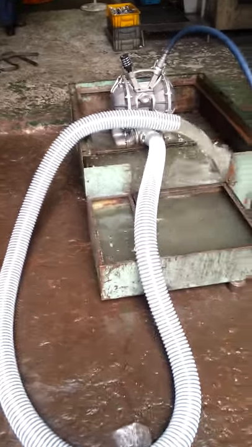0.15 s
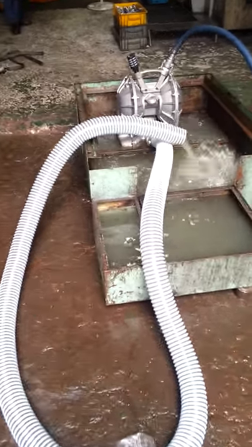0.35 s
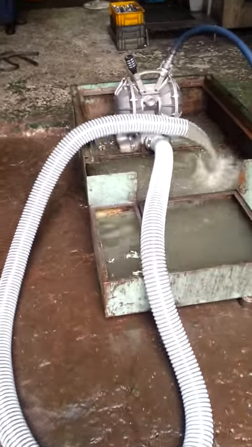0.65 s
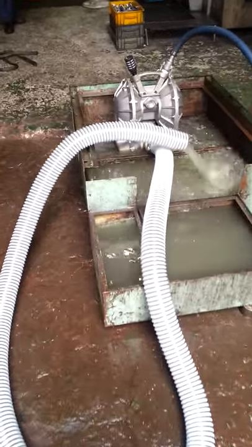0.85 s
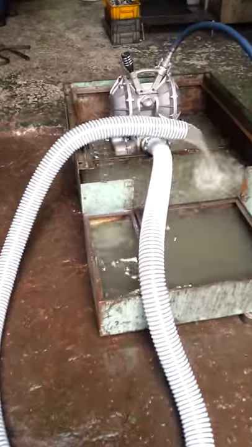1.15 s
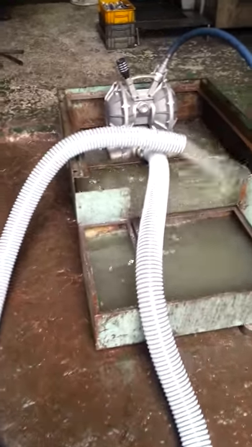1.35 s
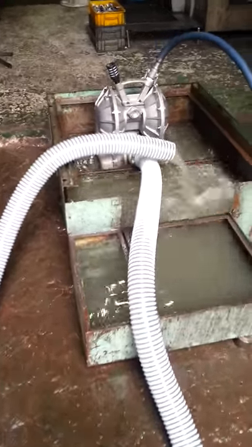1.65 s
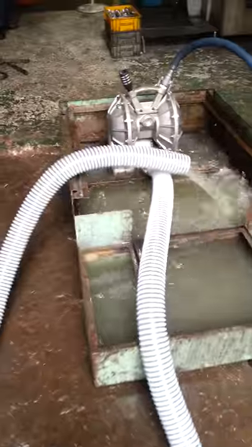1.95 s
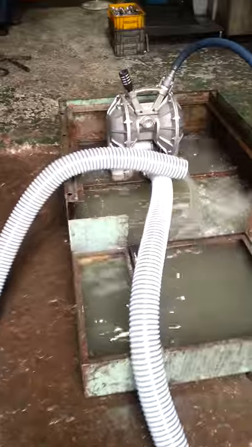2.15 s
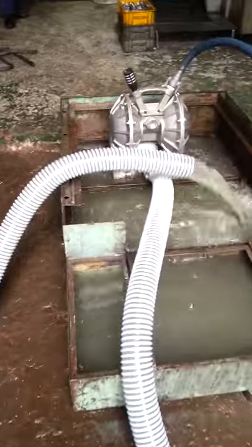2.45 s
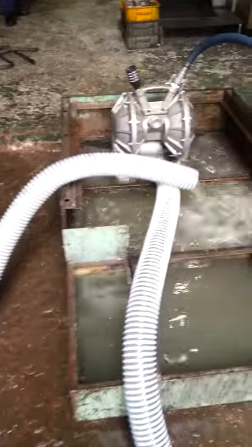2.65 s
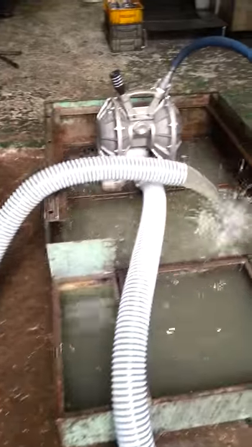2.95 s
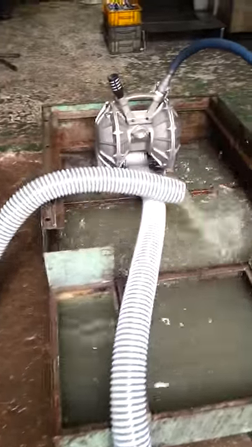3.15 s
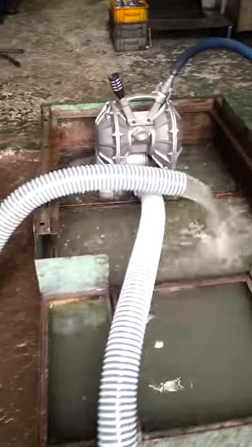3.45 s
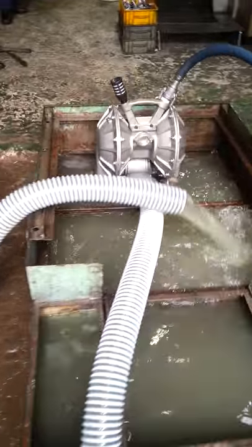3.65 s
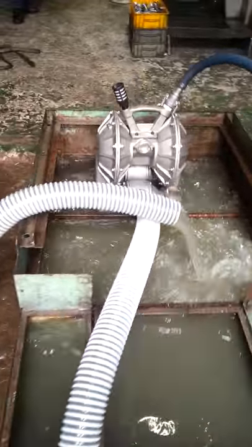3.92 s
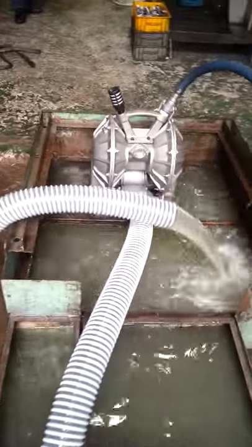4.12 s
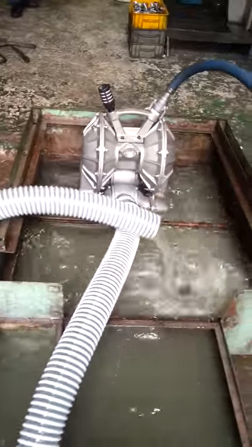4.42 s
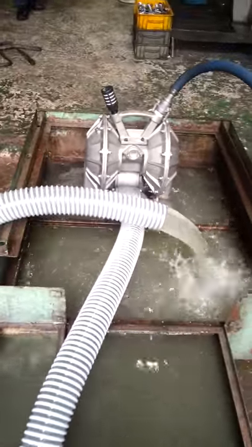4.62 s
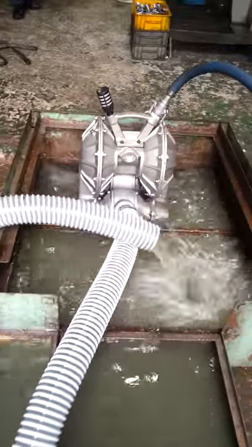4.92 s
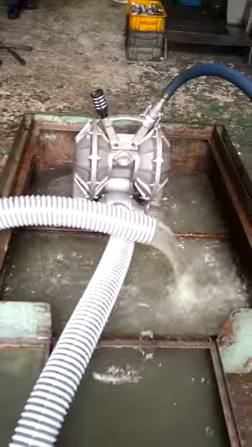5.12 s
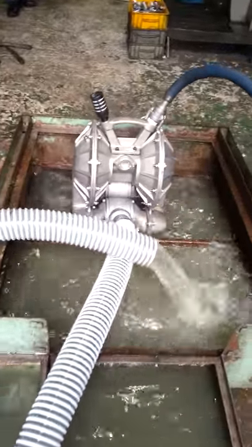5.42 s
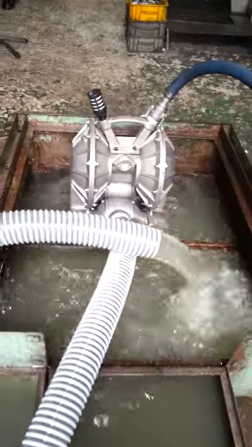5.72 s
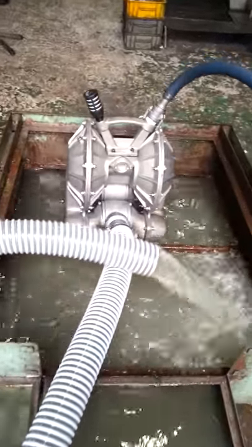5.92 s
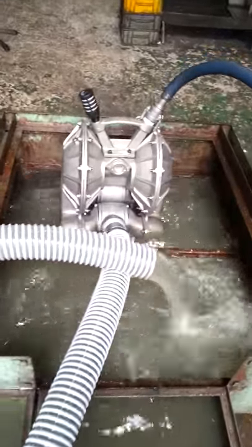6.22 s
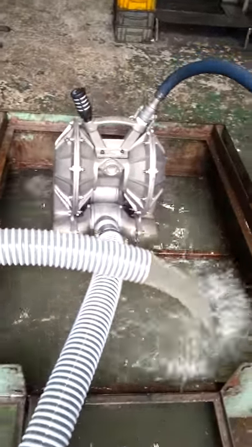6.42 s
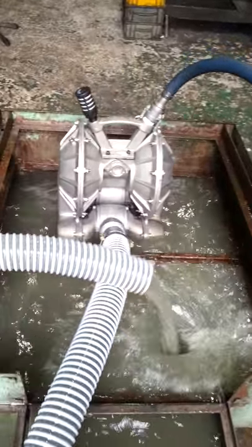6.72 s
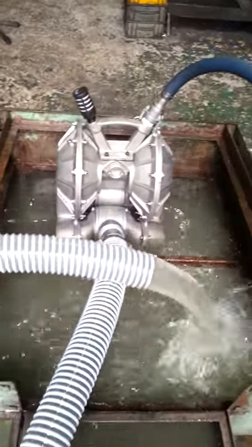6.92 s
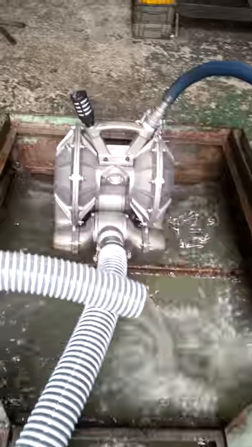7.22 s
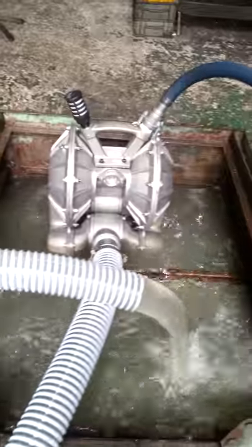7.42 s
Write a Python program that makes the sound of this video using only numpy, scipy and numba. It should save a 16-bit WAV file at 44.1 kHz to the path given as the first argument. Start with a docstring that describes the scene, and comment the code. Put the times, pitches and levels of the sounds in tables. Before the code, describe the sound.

A compressed-air pump hisses steadily with a sharp blast and knock about every half second, while water gushes, gurgles and glugs into a tank.

```python
"""A steady hiss of air, sharp blasts and knocks about every 0.57 s, and water that gushes, gurgles and glugs.
An air-driven diaphragm pump circulates water in a steel tank in a workshop; a phone hears it and moves closer.
Air noise is filtered hiss; at each reversal the valve knocks and a chamber blows down in a decaying blast.
About every third stroke sizzles and may whistle; delayed copies from nearby surfaces colour the hiss.
Water is noise plus thousands of bubbles, each a fading tone; large pockets of air plop and glug."""
import sys
import numpy as np
from scipy import signal
from scipy.fft import rfft, irfft
from scipy.io import wavfile
from scipy.ndimage import uniform_filter1d, minimum_filter1d
from numba import njit

SR = 44100
rng = np.random.default_rng(int(sys.argv[2]) if len(sys.argv) > 2 else 0)


def store_wav(level_fs):
    """Save 16-bit WAV to argv[1]."""
    pcm = np.round(np.clip(np.atleast_2d(level_fs), -1, 1) * 32767)
    wavfile.write(sys.argv[1], SR, pcm.T.astype(np.int16))


N = 333837
TIME = np.arange(N) / SR  # seconds
FREQS = np.fft.rfftfreq(N, 1 / SR)  # Hz

# How far the phone has moved towards the pump. Each row: time in seconds, distance in metres.
APPROACH = [(0, 0.067), (1.5, 0.21), (3, 0.54), (6, 1.374), (7.57, 1.46)]
# Soft low thumps as the phone overloads on some strokes. Each row: start in seconds, level in dB.
OVERLOAD_THUMPS = [(2.05, -58), (3.75, -57), (4.35, -58), (5.465, -46), (6.03, -57), (6.603, -42),
                   (7.172, -42)]
# The two microphone ports. Each row: pitch in Hz, likeness from 0 to 1, left lead in radians,
# left minus right in dB.
PORTS = [(250, 0.74, -0.1, 0.4), (400, 0.62, -0.2, 0.4), (560, 0.8, 0.2, -1.0), (730, 0.46, -0.6, 3.8),
         (880, 0.4, -1.3, -1.2), (1080, 0.47, -0.9, 0.3), (1350, 0.36, -2.6, 0.5), (1750, 0.29, -2.9, 2.0),
         (2150, 0.11, -2.0, 3.1), (2750, 0.18, -0.0, -1.4), (3600, 0.08, -2.8, -2.7),
         (5400, 0.15, 0.0, 0.5), (7000, 0.08, 1.8, -1.6), (12000, 0.06, 2.3, -3.3)]
# Overall colour of the water. Each row: pitch in Hz, relative level in dB.
SPLASH_COLOUR = [(120, -45), (215, -24), (275, -8), (420, -2.5), (580, 0.5), (800, 3.5), (1200, 2),
                 (2000, 8), (3500, 4.5), (7000, -2.5), (14000, -36)]
# Size groups of the gurgling bubbles. Each row: middle pitch in Hz, level in dB.
GURGLE_SIZES = [(620, -31.5), (950, -32), (1500, -30.5), (2400, -29.5)]
# Single bubbles that stand out. Each row: start in seconds, starting strength in dB, starting pitch in Hz.
GULPS = [(.262, -19, 548), (.968, -15, 540), (1.337, -15, 745), (1.405, -14.5, 770), (1.999, -17, 600),
         (2.258, -13, 1060), (2.322, -15.5, 667), (2.689, -14, 650), (3.102, -16, 577), (3.133, -17, 794),
         (3.27, -23, 570), (3.43, -17, 670), (3.94, -19, 562), (4.555, -21, 514), (4.823, -16, 784),
         (4.894, -12, 1035), (5.08, -13, 552), (6.347, -19, 597), (6.518, -16, 595), (6.551, -13, 860),
         (7.099, -17.5, 502), (7.123, -14.5, 580)]
# Deep glugs, a strong one as each gush lands and weaker ones between.
# Each row: start in seconds, reference level in dB, reference pitch in Hz.
GLUGS = [(0.216, -28, 245), (.415, -25, 234), (.772, -29, 220), (.945, -30, 226), (0.98, -21, 283),
         (1.135, -28, 223), (1.565, -24, 226), (1.668, -23.5, 221), (1.825, -31, 225), (1.988, -28, 221),
         (2.115, -22, 263), (2.298, -32, 200), (2.655, -25, 225), (2.695, -13, 307), (2.862, -24.5, 219),
         (2.99, -35, 223), (3.245, -15, 267), (3.295, -35, 205), (3.46, -37, 202), (3.825, -17.5, 247),
         (4.208, -28, 216), (4.385, -15, 242), (4.853, -29, 229), (4.963, -19, 232), (5.036, -26, 237),
         (5.13, -30.5, 211), (5.398, -27, 215), (5.528, -16, 245), (6.1, -18, 234), (6.18, -28, 226),
         (6.295, -34, 222), (6.535, -20, 230), (6.67, -16.5, 231), (6.87, -33, 223), (7.022, -30, 225),
         (7.248, -14, 232), (7.345, -23, 229)]
# The three pockets a glug breaks into. Each row: delay in seconds, level in dB relative to the glug,
# pitch as a ratio to the glug.
GLUG_PARTS = [(0, -8, 1.02), (.02, -9, 1.246), (.043, -12, 1.12)]
# Hollow bands in the rush, upper one first. Each row: centre in Hz, half width in Hz.
HOLLOW_BANDS = [(2010, 230), (1160, 210)]
# Their changing levels. Each row: time in seconds, upper band in dB, lower band in dB.
HOLLOW_LEVELS = [(0, -41, -49), (1.6, -28, -51), (2.1, -26.5, -35), (2.7, -23.5, -38), (3.2, -29.5, -38),
                 (5, -25.5, -33.5), (6.3, -28, -28.5), (7.57, -28, -26.5)]
# Valve reversals. Each row: start in seconds, blast in dB before a common lift, blow-down time in seconds,
# muffler song in dB, knock in dB.
STROKES = [(.332, -18, 0.12, -28, -32), (.906, -16, 0.13, -29, -20), (1.475, -16.5, 0.1, -32, -24),
           (2.047, -14.5, 0.12, -30, -18), (2.612, -16.5, 0.079, -26, -20), (3.187, -14, .085, -35, -19),
           (3.746, -17, 0.069, -26, -23), (4.325, -14.5, 0.061, -40, -12), (4.89, -17, .09, -31, -21),
           (5.46, -15, 0.1, -41, -14), (6.028, -14.5, 0.062, -33, -21), (6.602, -13, 0.094, -38, -11.5),
           (7.169, -13, 0.052, -19.5, -12.5)]
# Check balls that clack on their seats. Each row: start in seconds, level in dB.
CHECK_BALLS = [(.404, -23), (1.484, -19), (2.078, -19), (3.419, -17), (3.773, -15), (4.918, -14),
               (4.958, -12.5), (6.046, -13)]
# Ringing tones of the pump housing. Each row: pitch in Hz, level in dB relative to the knock,
# cycles until it has fallen by 60 dB.
HOUSING_TONES = [(1138, -4, 78), (2030, 2.5, 124), (2380, -25, 110)]
# Colour of the dull clack. Each row: pitch in Hz, relative level in dB.
KNOCK_COLOUR = [(40, -40), (180, -33), (320, -2), (600, -11), (1200, 0), (2500, -4), (8000, -33)]
# Times when the valve leaks. Each row: start in seconds, length in seconds, sizzle in dB.
LEAKS = [(.92, 0.48, -24.5), (2.633, 0.91, -27.5), (4.33, 0.48, -19), (5.93, 0.52, -20)]
# Colour of the sizzle. Each row: pitch in Hz, relative level in dB.
SIZZLE_COLOUR = [(3000, -53), (7000, -3), (9000, 4.5), (10500, 3), (14500, 0.5)]
# Whistles of the valve and muffler. Each row: start in seconds, length in seconds, starting pitch in Hz,
# sag in Hz per second (negative rises), width in Hz, level in dB before the flutter.
WHISTLES = [(1.1, 0.44, 11880, 0, 14, -33), (1.68, .18, 11900, 0, 26, -39), (4.332, .07, 8950, 0, 130, -26),
            (4.38, .34, 8850, -200, 50, -31), (4.457, 0.3, 10500, 500, 26, -21.5),
            (4.46, .24, 9900, 300, 45, -32), (4.885, .06, 8920, 0, 40, -29),
            (6.075, 0.36, 10440, 200, 24, -29), (5.92, .42, 9000, 0, 60, -34)]
# The muffler's lasting thin whistle. Each row: time in seconds, level in dB.
MUFFLER_WHISTLE = [(0, -34), (.7, -31), (1.0, -43), (1.7, -32), (2.15, -23), (2.5, -41), (3.05, -26),
                   (3.35, -42), (3.68, -22), (3.85, -36), (3.98, -24.5), (4.3, -23), (4.55, -32),
                   (5.7, -37), (5.95, -31), (6.7, -34), (7.15, -29), (7.57, -37)]
# Colour of the steady hiss. Each row: pitch in Hz, relative level in dB.
HISS_COLOUR = [(200, -49), (400, -18.5), (750, -6.5), (1400, 1), (2100, 0.5), (2900, -2.5), (5000, -2),
               (5800, -5), (7200, -3), (7800, -8), (10000, -10), (14500, -17.5)]
# Colour of the blast. Each row: pitch in Hz, relative level in dB.
BLAST_COLOUR = [(150, -28), (400, 0), (1200, 5.5), (2300, 10.5), (5000, 12), (8000, 5), (14500, 3)]
# Muffler resonances. Each row: centre in Hz, full width in Hz, added peak in dB relative to the plain hiss.
MUFFLER_RESONANCES = [(1920, 13, 4), (3540, 220, -1.5), (5250, 84, -17), (6960, 43, -6), (7220, 120, -17)]

STROKE_S = .57
RUMBLE_DB, RUMBLE_HZ, THUMP_HZ = -79, 130, 120
WATER_DB = -22.5
# Each gush lands a little after the reversal; its churn jumps, then dies down until the next.
LANDING_S, SURGE_DB, SURGE_FALL_DB_PER_S = 0.052, 3, 12
# The spray is strongest just after the reversal and weakest about half a stroke later.
SPRAY_PEAK_S, SPRAY_SWING_DB = 0.023, 2
MUFFLER_WHISTLE_HZ, MUFFLER_WHISTLE_WIDTH_HZ = 6884, 8
# The hiss starts near this level and gains as the phone comes closer.
AIR_DB, AIR_DB_PER_M = -14.5, 0.85
# The spool shuts the exhaust a little before it flips: a slight dip; a second dip fades after the flip.
SHUT_S, SHUT_DB = 0.022, -0.5
AFTER_DIP_S, AFTER_DIP_DB = 0.013, -0.5
# Above 1, the choked exhaust holds a blast up before it falls.
BLOWDOWN_HOLD = 1.3
# The muffler's song after a blast is a narrow band of hiss that fades over the stroke.
SING_HZ, SING_WIDTH_HZ, SING_S = 3480, 44, 0.34
CEILING, TOP_HZ = .97, 14500  # peak limit as a share of full scale, and treble limit


def undb(db):
    """Turn decibels into a gain."""
    return 10 ** (np.asarray(db) / 20)


def unit(x):
    """Scale a sound to an rms (average strength) of 1."""
    return x / np.sqrt(np.mean(x ** 2))


def curve(table, at=TIME, axis=1):
    """Join one column of a table by straight lines."""
    rows = np.array(table)
    return np.interp(at, rows[:, 0], rows[:, axis])


def over_pitch(table, axis=1):
    """Join one column of a table along a logarithmic pitch scale."""
    rows = np.array(table)
    return np.interp(np.log(FREQS + 1), np.log(rows[:, 0]), rows[:, axis])


def colour(x, gain):
    """Filter by a gain for each frequency, then scale to rms 1."""
    return unit(irfft(rfft(x) * gain, N))


def noise():
    """Turbulence as separate random noise for the two ports."""
    return rng.standard_normal((2, N))


def low_noise(corner_hz):
    """Noise that weakens smoothly above a corner frequency."""
    return colour(noise(), 1 / (1 + (FREQS / corner_hz) ** 2))


def band(hz, width_hz):
    """Noise in one resonance, strongest at its centre."""
    return colour(noise(), 1 / (1 + ((FREQS - hz) / width_hz) ** 2))


def walk(rate_hz):
    """Wander smoothly and randomly with a spread of 1."""
    return colour(rng.standard_normal(N), np.exp(-(FREQS / rate_hz) ** 2))


def burst(start, rise, fall, hold=1):
    """Open quickly, then fall exponentially, or stay up at first when hold is over 1."""
    age = np.maximum(TIME - start, 0)
    opening = 1 - np.exp(-age / rise)
    return opening * np.exp(-np.minimum(age / fall, 20) ** hold)


def swell(start, length):
    """Rise and fall as the square root of half a sine wave."""
    progress = np.clip((TIME - start) / length, 0, 1)
    return np.sqrt(np.sin(np.pi * progress).clip(0))


def tone(hz, width_hz, rough=0.51):
    """An unsteady jet tone: its strength and phase waver, which widens its line."""
    waver = low_noise(width_hz)
    drift = low_noise(width_hz)
    phase = 2 * np.pi * np.cumsum(hz * np.ones(N)) / SR
    return unit((1 + rough * waver) * np.sin(phase + 2 * drift))


@njit
def ring(starts, hz, cycles, sizes, glide):
    """Fading sines; cycles counts to -60 dB, and glide raises the pitch as a bubble nears the surface."""
    out = np.zeros(N)
    for k in range(len(starts)):
        first, length = int(starts[k] * SR), int(cycles[k] * SR / hz[k]) + 2
        step = 2 * np.pi * hz[k] / SR
        # Turning a complex number makes the sine; each turn also shrinks it a little.
        state = sizes[k] + 0j
        turn = np.exp(1j * step - np.log(1000) / length)
        bend = np.exp(1j * step * glide / length)
        for i in range(max(first, 0), min(first + length, N)):
            out[i] += state.imag
            state *= turn
            turn *= bend
    return out


def closer(db_per_m):
    """Decibels gained as the phone nears the pump."""
    return db_per_m * curve(APPROACH)


def since_reversal(lag):
    """Seconds since the latest moment that lies lag seconds after a reversal."""
    # One earlier reversal began the stroke already under way.
    reversals = np.array([STROKES[0][0] - STROKE_S] + [row[0] for row in STROKES])
    marks = reversals + lag
    return TIME - marks[np.maximum(np.searchsorted(marks, TIME) - 1, 0)]


def ports(pair):
    """Two ports a hand apart hear the bass much alike and the treble almost unrelated."""
    shared, separate = rfft(pair)
    like = np.clip(over_pitch(PORTS), 0, .98)
    lag = np.exp(-1j * over_pitch(PORTS, axis=2))
    right = like * shared * lag + np.sqrt(1 - like ** 2) * separate
    lean = undb(over_pitch(PORTS, axis=3) / 2)
    return irfft(np.array([shared * lean, right / lean]), N)


def low_cut(x, hz):
    """Remove the bass steeply below a chosen frequency."""
    return irfft(rfft(x) / np.sqrt(1 + (hz / (FREQS + 1)) ** 44), N)


def tank(x, t60, wet_db):
    """Direct sound plus dense reflections from tank and workshop, different at each port."""
    age = TIME[:SR // 2]
    tail = rng.standard_normal((2, len(age))) * undb(-60 * age / t60)
    tail *= age > .003  # reflections start after 3 ms
    tail *= undb(wet_db) / np.sqrt(np.sum(tail ** 2, axis=1, keepdims=True))
    return x + signal.fftconvolve(x[None], tail, axes=1)[:, :N]


def reflections(x, echo_db, longest_s, count=12):
    """Floor, water and tank walls echo the air noise; paths change with the phone and shift its colour."""
    travel_s = uniform_filter1d(curve(APPROACH), SR // 2) / 343  # distance over speed of sound in m/s
    out = x.copy()
    for side in range(2):
        for path, slant in rng.random((count, 2)):
            delay = 0.00099 + longest_s * path + .5 * slant * travel_s
            out[side] += undb(echo_db) * np.interp(TIME - delay, TIME, x[side], left=0)
    return out / np.sqrt(1 + count * undb(echo_db) ** 2)


def rumble(fall=0.019):
    """The workshop's faint low noise, and soft low thumps as the phone overloads on some strokes."""
    thump_level = sum(undb(db) * burst(t, 0.003, fall) for t, db in OVERLOAD_THUMPS)
    thumps = thump_level * low_noise(THUMP_HZ)
    return thumps + undb(RUMBLE_DB) * low_noise(RUMBLE_HZ)


def hollows():
    """Two hollow noise bands in the rush that come forward as the phone moves in over the tank."""
    out = 0
    for k, (hz, width_hz) in enumerate(HOLLOW_BANDS):
        out = out + band(hz, width_hz) * undb(curve(HOLLOW_LEVELS, axis=k + 1))
    return out


def cloud(low_hz, high_hz, cycles, scatter_db, count):
    """Bubbles of many sizes ring at random moments, a few much louder than the rest."""
    when, size, life, strength = rng.random((count, 4)).T
    hz = low_hz * (high_hz / low_hz) ** size
    loudness = undb(-scatter_db * np.log(np.maximum(strength, .01)))
    sizes = loudness * np.sqrt(hz / low_hz)
    return ring(when * N / SR, hz, cycles * (.5 + life), sizes, 0.26)


def gush(wash_db=-7, churn_hz=380, lumpy_db=3.0):
    """The jet drives bubbles and spray into the tank; the deep churn surges with each stroke."""
    bubbles = np.array([cloud(225.4, 11820, 34.0, 3.14, count=18000) for side in range(2)])
    water = colour(unit(bubbles) + undb(wash_db) * noise(), undb(over_pitch(SPLASH_COLOUR)))
    deep = irfft(rfft(water) / (1 + (FREQS / churn_hz) ** 8), N)
    surge_db = SURGE_DB - SURGE_FALL_DB_PER_S * since_reversal(LANDING_S)
    churn = deep * undb(surge_db + lumpy_db * walk(11))
    clumps_db = .9 * walk(25)
    swing_db = SPRAY_SWING_DB * np.cos(2 * np.pi * since_reversal(SPRAY_PEAK_S) / STROKE_S)
    spray = (water - deep) * undb(swing_db + clumps_db)
    return (churn + spray) * undb(WATER_DB)


def gurgle():
    """Middling bubbles boil up in irregular clusters, each size at its own moments."""
    out = 0
    for hz, db in GURGLE_SIZES:
        bubbles = np.array([cloud(hz / 1.3, hz * 1.3, 32, 1.6, count=900) for side in range(2)])
        clusters_db = 5 * np.tanh(walk(9))
        out = out + unit(bubbles * undb(clusters_db)) * undb(db)
    return out


def pockets(gulp_cycles=42, glug_cycles=27, glide=0.089):
    """Large air pockets pinch off under the jet and ring, mostly direct: plops, and glugs that break in three."""
    rows = [(t, db, hz, gulp_cycles) for t, db, hz in GULPS]
    for t, db, hz in GLUGS:
        for lag, part_db, ratio in GLUG_PARTS:
            rows.append((t + lag, db + part_db, hz * ratio, glug_cycles))
    when, db, hz, cycles = np.array(rows, dtype=float).T.copy()
    return tank(ring(when, hz, cycles, undb(db), glide), t60=.18, wet_db=-9)


def knocks(fall=0.014, ball_fall=0.0047):
    """Spool and check balls land in the water-filled housing: short dull clacks that ring the casting."""
    blows = [(t, db, fall) for t, *_, db in STROKES]
    blows += [(t, db, ball_fall) for t, db in CHECK_BALLS]
    strength = sum(undb(db) * burst(t, 0.001, length) for t, db, length in blows)
    clack = colour(noise(), undb(over_pitch(KNOCK_COLOUR))) * strength
    rows = [(t, db + mode_db, hz, cycles) for t, db, _ in blows for hz, mode_db, cycles in HOUSING_TONES]
    when, db, hz, cycles = np.array(rows, dtype=float).T.copy()
    return clack + ring(when, hz, cycles, undb(db), 0.)


def leak(flutter_db=0.5):
    """Air squeezes past the valve: a fine sizzle, and fluttering whistles whose pitch may slide."""
    sizzle_level = sum(undb(db) * swell(t, length) for t, length, db in LEAKS)
    out = colour(noise(), undb(over_pitch(SIZZLE_COLOUR))) * sizzle_level
    flutter = unit(undb(flutter_db * walk(21)))
    for t, length, hz, sag, width_hz, db in WHISTLES:
        pitch_hz = hz - sag * np.clip(TIME - t, 0, length)
        out = out + tone(pitch_hz, width_hz) * swell(t, length) * flutter * undb(db)
    thin_whistle = tone(MUFFLER_WHISTLE_HZ, MUFFLER_WHISTLE_WIDTH_HZ, rough=.25)
    return out + thin_whistle * undb(curve(MUFFLER_WHISTLE))


def exhaust(flutter_db=0.71, blast_db=4.0):
    """Air hisses in the muffler's resonances; each reversal's blow-down blasts and makes the muffler sing."""
    resonant_power = 1
    for hz, width_hz, db in MUFFLER_RESONANCES:
        resonant_power = resonant_power + undb(db) ** 2 / (1 + (2 * (FREQS - hz) / width_hz) ** 2)
    valve_db = 0
    for t, *_ in STROKES:
        valve_db = valve_db + SHUT_DB * np.exp(-((TIME - t) / SHUT_S) ** 2) * (TIME < t)
        valve_db = valve_db + AFTER_DIP_DB * burst(t, 0.001, AFTER_DIP_S)
    hiss_db = AIR_DB + closer(AIR_DB_PER_M) + valve_db + flutter_db * walk(27)
    hiss = colour(noise(), undb(over_pitch(HISS_COLOUR)) * np.sqrt(resonant_power)) * undb(hiss_db)
    pressure = sum(undb(db) * burst(t, 0.00056, length, BLOWDOWN_HOLD) for t, db, length, _, _ in STROKES)
    sputter_db = 1.3 * walk(110)
    blast = colour(noise(), undb(over_pitch(BLAST_COLOUR))) * pressure * undb(blast_db + sputter_db)
    sing_level = sum(undb(db) * burst(t, 0.01, SING_S) for t, _, _, db, _ in STROKES)
    return hiss + blast + sing_level * band(SING_HZ, SING_WIDTH_HZ)


def scene(rush_cut_hz=252, glug_cut_hz=196):
    """Pump and water over the workshop's rumble; big air pockets reach lower than the rush."""
    air = reflections(exhaust(), echo_db=-17, longest_s=.009)
    rush = ports(air + hollows() + leak() + knocks() + gush() + gurgle())
    return low_cut(rush, rush_cut_hz) + low_cut(pockets(), glug_cut_hz) + ports(rumble())


def record(dry):
    """The phone's very fast limiter shaves the highest peaks of each channel; the top treble is cut."""
    top_cut = signal.ellip(10, .2, 70, TOP_HZ, fs=SR, output="sos")
    peaks = np.abs(signal.sosfilt(top_cut, dry))
    room = CEILING / np.maximum(peaks, CEILING)
    gain = uniform_filter1d(minimum_filter1d(room, size=41), size=35)  # about 1 ms, in samples
    return signal.sosfilt(top_cut, dry * gain)


dry = scene()
out = record(dry)
store_wav(out)
```